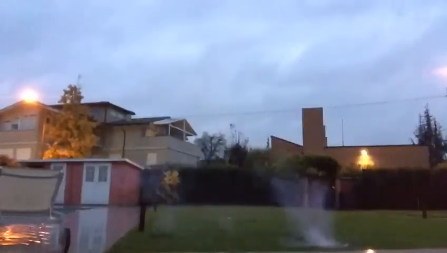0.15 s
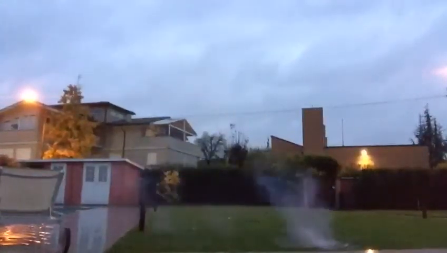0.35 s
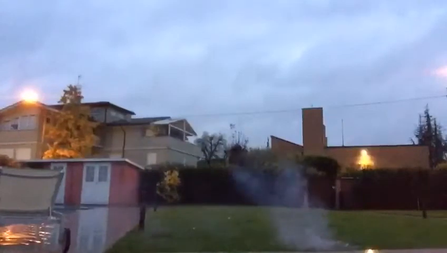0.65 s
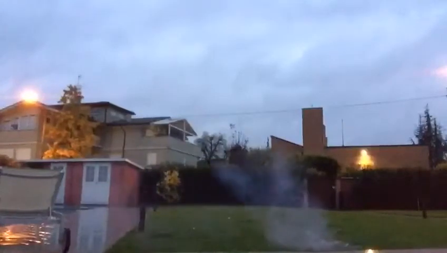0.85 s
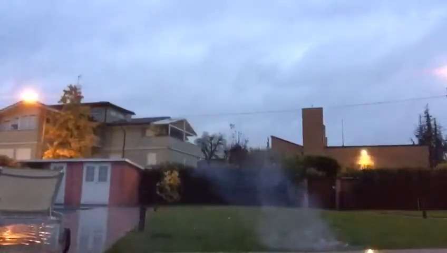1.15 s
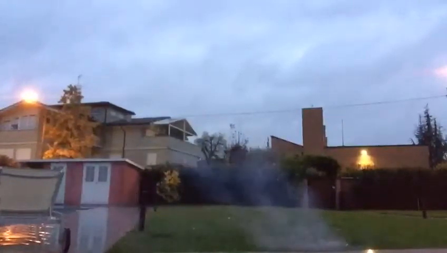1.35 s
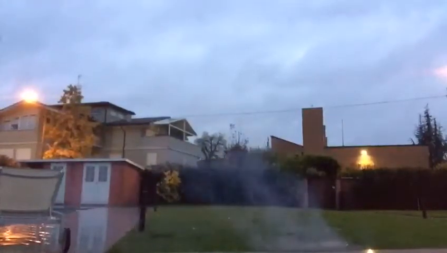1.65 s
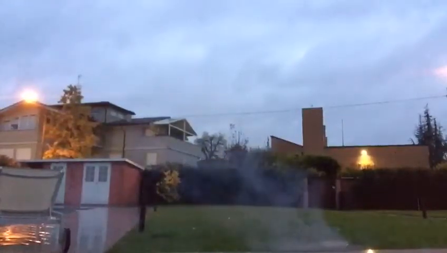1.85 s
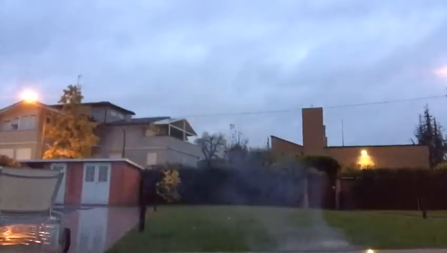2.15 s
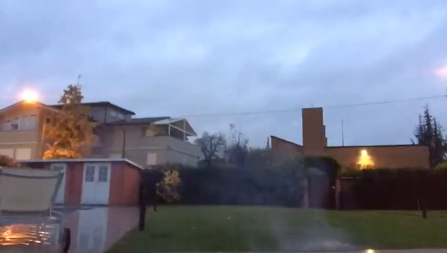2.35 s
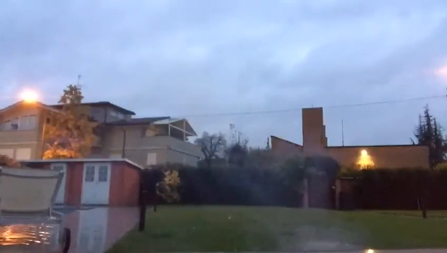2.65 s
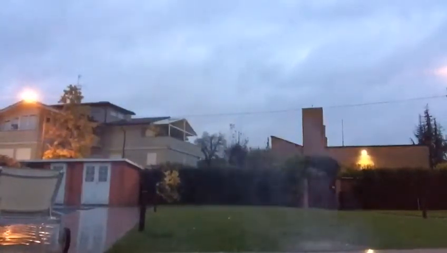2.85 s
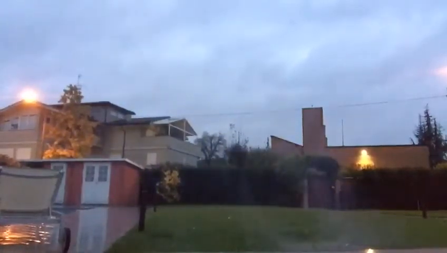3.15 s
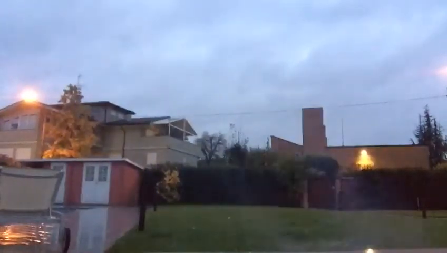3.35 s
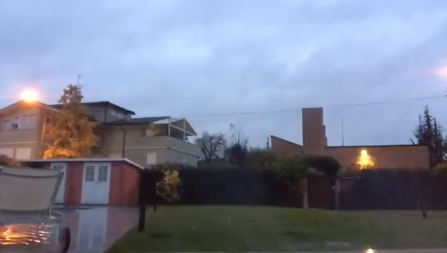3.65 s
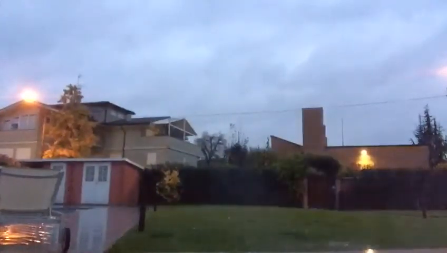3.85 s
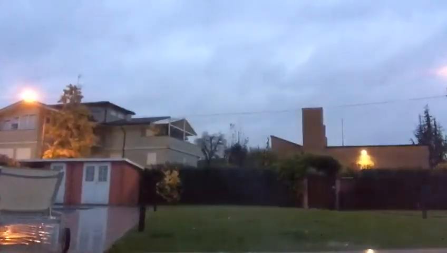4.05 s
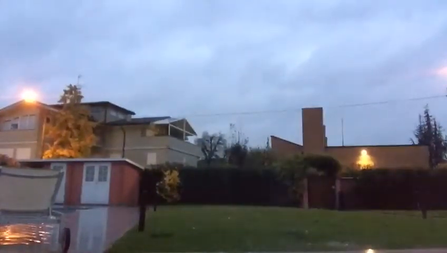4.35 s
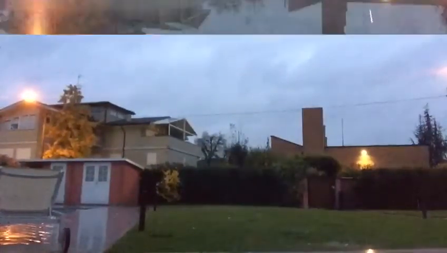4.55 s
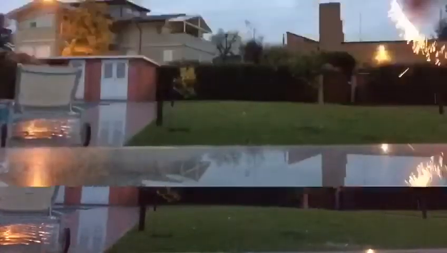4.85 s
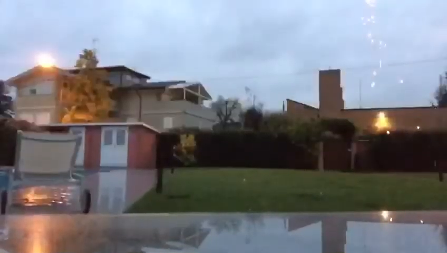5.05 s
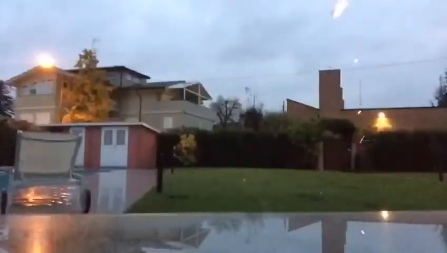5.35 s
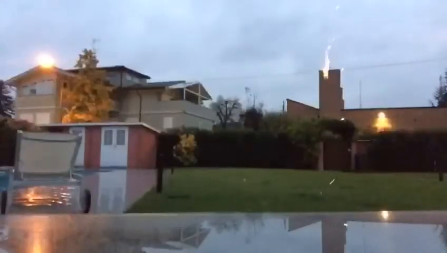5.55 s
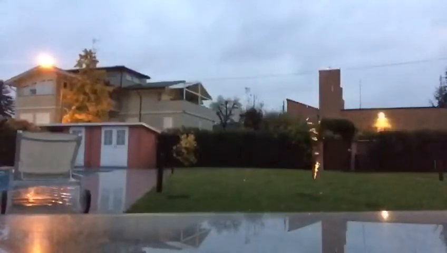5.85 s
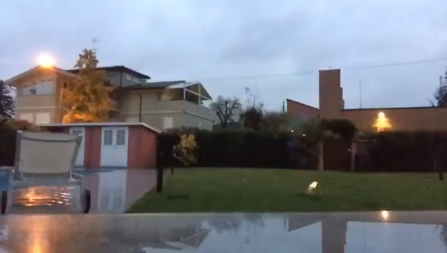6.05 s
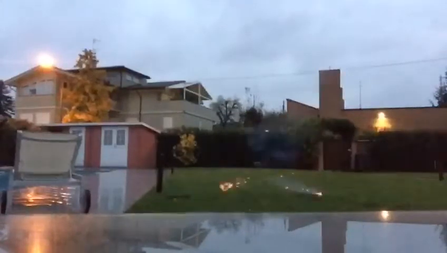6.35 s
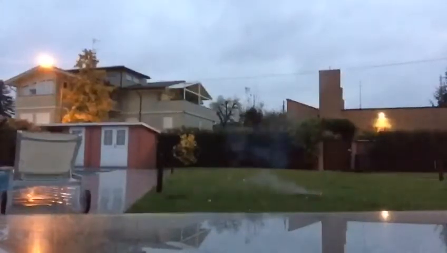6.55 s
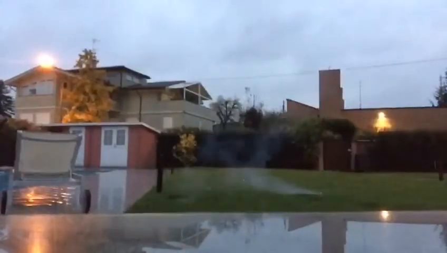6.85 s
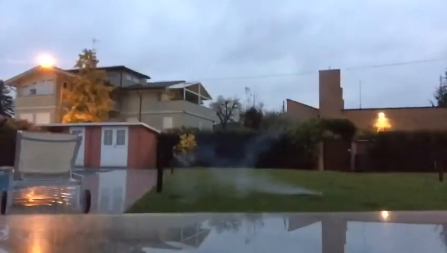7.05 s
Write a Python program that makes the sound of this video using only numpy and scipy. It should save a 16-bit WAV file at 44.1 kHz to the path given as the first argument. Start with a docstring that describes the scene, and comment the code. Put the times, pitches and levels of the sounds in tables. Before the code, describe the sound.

A low town hum with wavering distant traffic runs throughout, heard from a garden among houses. At the start a firework's soft rush dies away, and the traffic swells slightly around 1 to 1.5 seconds. At 3 seconds a tight cluster of loud, dull firecracker booms comes from a distance and echoes along the street. Smaller booms follow between 3.6 and 4.3 seconds, with faint hisses, two hollow pops at about 3.8 and 4.05, and a deep rumble lasting about a second. From 4.6 a rocket hisses up in sputtering spurts, thinning by 5.5 to a faint fuse sizzle. At 6.2 and 6.7 seconds two firecrackers burst nearby on the lawn, by far the loudest sounds, sharp and overloading the microphone. Each slaps back off house fronts and leaves a dull roll. The level drops suddenly just after 7 seconds.

```python
"""A garden among houses, with firecrackers going off over the hum of a town. Dull booms come from out of
sight, followed by smaller ones and two hollow pops. A rocket hisses up on the gas from its burning
powder. Then two crackers burst on the lawn, and their blast waves overload the microphone.
Hedges and house fronts scatter and echo the bangs."""
import sys
import numpy as np
from scipy import signal
from scipy.fft import rfft, irfft
from scipy.io import wavfile

SR = 44100
rng = np.random.default_rng(int(sys.argv[2]) if len(sys.argv) > 2 else 0)


def transcribe(u):
    """Save the signal u as a 16-bit wav file named by the first command-line argument.

    u: samples, shape (n,) or (channels, n), limited to [-1, 1]; the rate is SR.
    q: integer samples, one column per channel.
    """
    v = np.clip(np.atleast_2d(u).T, -1, 1)
    q = np.round(v * 32767).astype(np.int16)
    wavfile.write(sys.argv[1], SR, q)


N = 317516
T = np.arange(N) / SR


def gain(db):
    """Turn decibels (dB) into a number to multiply by."""
    return 10 ** (np.asarray(db) / 20)


def unit(x):
    """Scale a sound to an average power of 1."""
    return x / np.sqrt(np.mean(x ** 2))


def decay(start, fade, rise=0.0001):
    """Loudness that rises at start and dies away. A fade time is the seconds it takes to fall 60 dB."""
    age = np.maximum(T - start, 0)
    return -np.expm1(-age / rise) * np.exp(-np.log(1000) * age / fade)


def swell(start, full, end, sag_db_per_s, fade, bend=1):
    """Loudness that builds from start to full, then sags, and dies away after end."""
    build = np.clip((T - start) / (full - start), 0, 1) ** bend
    sag = gain(-sag_db_per_s * np.maximum(T - full, 0))
    return build * sag * np.exp(-np.log(1000) * np.maximum(T - end, 0) / fade)


def colour(x, tone, size=4096):
    """Filter a sound to follow rows of (Hz, dB); white noise keeps its power."""
    hz, db = np.transpose(tone)
    freqs = np.maximum(np.fft.rfftfreq(size, 1 / SR), 1)
    cepstrum = irfft(np.log(gain(np.interp(np.log(freqs), np.log(hz), db))))
    cepstrum[1:size // 2] *= 2  # folded so the filter rings only after a sound, never before
    cepstrum[size // 2 + 1:] = 0
    response = irfft(np.exp(rfft(cepstrum)))
    return signal.oaconvolve(x, response / np.linalg.norm(response))[:N]


def band(hz, width):
    """Noise around one pitch, filtered twice for steep edges."""
    b, a = signal.iirpeak(hz, hz / width, fs=SR)
    return unit(signal.lfilter(b, a, signal.lfilter(b, a, rng.standard_normal(N))))


def wander(per_second):
    """A line that drifts between random values, mostly within -1 to 1."""
    points = rng.standard_normal(4096)
    return np.interp(T * per_second, np.arange(len(points)), points)


def scatter(spread_db, clump_db):
    """Many tiny echoes of uneven strength, arriving in clumps."""
    return unit(rng.standard_normal(N) * gain(spread_db * wander(830) + clump_db * wander(130)))


def shock(start, length):
    """A blast wave: the air pressure jumps, then a longer suction follows."""
    age = np.maximum(T - start, 0) / length
    return (T >= start) * (1 - age) * np.exp(-age)


# The direct sound, then its bounces off a table and walls. Each row: delay in seconds, level in dB.
PATIO_BOUNCES = [(0, 6.5), (.0019, -17.5), (.0036, -16.5), (.0061, -13.5), (.0092, -11), (0.0135, -9.5),
                 (0.022, -18)]
def patio(x):
    """Hard surfaces close by add quick copies, which make a sound hollow."""
    copies = sum(gain(db) * np.interp(T - delay, T, x, left=0) for delay, db in PATIO_BOUNCES)
    return copies / np.linalg.norm([gain(db) for delay, db in PATIO_BOUNCES])


def rumble():
    """Deep bass that is always there and stands out for about a second after the big booms."""
    steady = gain(-46.5) * band(hz=65.4, width=20)
    rise = gain(-33) * swell(start=3.5, full=4, end=4.5, sag_db_per_s=4.5, fade=0.88)
    even_bass = unit(np.tanh(band(hz=68.4, width=24.5)))  # squashed to hold its level
    return steady + rise * even_bass


# The tone of the town's hum. Each row: frequency in Hz, relative level in dB.
HUM_TONE = [(15, -47), (25, -21), (40, -9), (60, -2.5), (77, -2), (107, -7), (299, -8), (425, -15),
            (470, -15), (756, -10.5), (972, -17.5), (1910, -29.5), (2520, -29.5), (3960, -38.5),
            (10000, -42), (13000, -92), (22000, -120)]
# Swells of low roar: distant traffic, and the roar under the burning fireworks at 0 and 5.1 seconds.
# Each row: loudest moment in seconds, half length in seconds, roar in dB, higher whoosh in dB.
ROAR_SWELLS = [(0, 0.17, -41, -49), (0.847, .45, -49.5, -47.5), (1.486, 0.085, -40.5, -69),
               (5.1, 0.19, -42.5, -52)]
def background():
    """The town's hum, rumble and wavering traffic, with swells of low roar on top."""
    roar_power, whoosh_power = gain(-52) ** 2, gain(-50) ** 2  # steady traffic and its tyres
    for when, half_length, roar_db, whoosh_db in ROAR_SWELLS:
        hump = np.exp(-((T - when) / half_length) ** 2)
        roar_power += hump * gain(roar_db) ** 2
        whoosh_power += hump * gain(whoosh_db) ** 2
    hum = unit(colour(rng.standard_normal(N), HUM_TONE)) * gain(-40)
    roar = band(hz=560, width=520) * np.sqrt(roar_power) * gain(2 * wander(25))
    whoosh = band(hz=930, width=317) * np.sqrt(whoosh_power) * gain(2 * wander(25) + 2 * wander(5))
    return hum + roar + whoosh + rumble()


# Far pops. Each row: loudest moment in seconds, level in dB, pitch in Hz, rise and fall time in seconds.
FAR_POPS = [(3.767, -26, 533, 0.009), (4.05, -18, 632, 0.0041)]
def pops():
    """Small far pops arrive as a few wavering cycles of one hollow note."""
    out = 0
    for when, db, hz, length in FAR_POPS:
        note = np.sin(2 * np.pi * hz * (T - when)) + 0.3 * band(hz, width=260)
        out += gain(db) * np.exp(-np.abs(T - when) / length) * note
    return out


# Three bands of noise: rush, hiss and sizzle. Each row: centre in Hz, width in Hz.
HISS_BANDS = [(2620, 1540), (6400, 4100), (9200, 2300)]
# For rush, hiss and sizzle in turn: how the build-up bends (1 is a straight line).
HISS_BENDS = [0.96, 1.06, 0.95]
# For the same three: how fast each weakens after building up, in dB per second.
HISS_SAGS = [33, 14.5, 9.5]
# Each row: start, end of build-up and start of fade in seconds, then rush, hiss and sizzle in dB.
# At 3.25, 3.53 and 4.28 seconds: faint, brief hisses after the booms, like bright echoes of their cracks.
HISSES = [(-.2, 0.034, .09, -43.5, -85, -85), (3.25, 3.38, 3.33, -55, -68, -61),
          (3.53, 3.58, 3.59, -79, -62, -64), (4.28, 4.347, 4.3, -53, -74, -80),
          (4.577, 4.715, 4.76, -43.5, -49, -55.5), (4.71, 4.865, 4.94, -41.5, -41.5, -46.5),
          (4.955, 5.077, 5.13, -43.5, -60, -40.5), (5.098, 5.31, 5.37, -53.5, -59, -46),
          (5.2, 5.623, 6.23, -58, -57, -60.5)]
def rocket_and_hisses():
    """A firework dies away, faint hisses follow the booms, a rocket spurts gas, then a fuse burns."""
    rush, hiss, sizzle = [band(hz, width) for hz, width in HISS_BANDS]
    rush = signal.sosfilt(signal.butter(6, 3560, "low", fs=SR, output="sos"), rush)
    low_roar = gain(-6.5) * band(hz=560, width=460)
    out = 0
    for k, noise in enumerate([rush + low_roar, hiss, sizzle]):
        power = 0
        for start, full, end, *levels_db in HISSES:
            shape = swell(start, full, end, HISS_SAGS[k], fade=0.69, bend=HISS_BENDS[k])
            power += (gain(levels_db[k]) * shape) ** 2
        out += noise * np.sqrt(power)
    sputter = gain(1.2 * wander(45))
    return patio(sputter * out)


# The tones of a boom's crack and of its street echo. Each row: frequency in Hz, relative level in dB.
CRACK_TONE = [(40, -8), (200, 8.5), (600, 4.5), (1000, -5.5), (1600, -17.5), (2600, -18.5), (4500, -40),
              (7000, -37.5), (10000, -42.5)]
STREET_TONE = [(40, 8.5), (200, -4.5), (520, 2.5), (950, -3), (1600, -16.5), (2600, -25.5), (4500, -42),
               (10000, -46)]
# The notes a boom rings with. Each row: pitch in Hz, level in dB, fade time in seconds.
BOOM_NOTES = [(52, -17, 0.32), (102.4, -12, 0.29), (130.6, -6.5, 0.32), (145, -10, 0.14),
              (230.7, -0.5, 0.076), (257.5, -9, 0.097), (380, -20, 0.076), (649, -2, 0.032),
              (870, -6.5, 0.042), (1030, -14, 0.035), (1467, -13.5, 0.12), (2450, -5, .04)]
# The routes a boom takes to us, the later ones blunter.
# Each row: delay in seconds, push change in dB, times the push is stretched, crack change in dB.
BOOM_ROUTES = [(0, 0.5, 0.86, 2), (.0042, -3, 1.87, -9), (0.0172, -5.5, 8, -15), (0.0473, -7.5, 9, -28),
               (.0674, -3, 8, -30)]
# The street fills with sound, then far house fronts answer.
# Each row: delay in seconds, level change in dB, rise and fade times in seconds.
STREET_ANSWERS = [(.007, -33, 0.0064, 1), (0.261, -25, 0.058, 0.56)]
# Blasts out of sight. Each row: start in seconds, level in dB, push length before stretching in seconds,
# crack in dB above that level, the crack's fade time in seconds.
HIDDEN_BLASTS = [(3.0135, -2, 0.0003, -7.5, 0.12), (3.0482, -5.5, 0.00021, 5, 0.034),
                 (3.0533, 6, 0.00034, -2.5, 0.063), (3.1136, -9.5, 0.001, 3, 0.07),
                 (3.639, -19.5, 0.0048, -16, .05), (3.693, -17, 0.0069, -30, 0.055),
                 (3.746, -25, 0.003, -15, 0.11), (4.128, -19, 0.00033, -5.5, 0.14),
                 (4.154, -24, 0.00013, -1.5, 0.096), (4.199, -27.5, 0.00064, -2.5, 0.29),
                 (4.31, -30, 0.0014, -10, 0.31)]
def booms():
    """Muffled blasts: a push of air rings low notes, a short crack rides on it, and the houses answer."""
    push, crack_power, street_power = 0, 0, 0
    for start, db, length, crack_db, crack_fade in HIDDEN_BLASTS:
        for delay, route_db, stretch, route_crack_db in BOOM_ROUTES:
            stretched = length * stretch  # a longer push sounds deeper
            push += 2 * gain(db + route_db) * shock(start + delay, stretched) / (stretched * SR)
            crack_shape = decay(start + delay, crack_fade, rise=0.0012)
            crack_power += (gain(db + crack_db + route_crack_db) * crack_shape) ** 2
        for delay, echo_db, rise, fade in STREET_ANSWERS:
            street_power += (gain(db + echo_db) * decay(start + delay, fade, rise)) ** 2
    t = T[:SR]
    ring = sum(gain(db) * np.cos(2 * np.pi * hz * t) * np.exp(-np.log(1000) * t / fade)
               for hz, db, fade in BOOM_NOTES)
    muffle = signal.butter(2, 1100, "low", fs=SR, output="sos")
    body = signal.sosfilt(muffle, signal.oaconvolve(push, ring)[:N])
    cracks = colour(np.sqrt(crack_power) * scatter(spread_db=2.5, clump_db=3), CRACK_TONE)
    echoes = colour(np.sqrt(street_power) * scatter(spread_db=2, clump_db=1.5), STREET_TONE)
    return body + patio(cracks + echoes)


# The tones of the garden's scatter, the house echoes and the long roll.
# Each row: frequency in Hz, relative level in dB.
GARDEN_TONE = [(30, -22.5), (100, -11.5), (250, -4.5), (430, -5), (620, 3), (950, -8), (1700, -13),
               (2800, -12.5), (4300, -24.5), (7000, -24.5), (10000, -28.5)]
HOUSE_TONE = [(30, -20.5), (120, -11.5), (280, 4), (550, 2.5), (950, -14), (1700, -20), (2900, -11.5),
              (4200, -25.5), (6500, -28), (8500, -35), (10000, -42.5)]
ROLL_TONE = [(40, -47), (130, -9), (330, 4.5), (600, 1.5), (1100, -4), (1900, -8.5), (2700, -5.5),
             (3300, -13.5), (4200, -27), (6000, -28), (8000, -45), (10000, -47)]
# Echoes off the houses. Each row: delay in seconds, level change in dB, rise and fade times in seconds.
HOUSE_ECHOES = [(0.045, -17, .002, 0.078), (0.103, -18, 0.0024, 0.14), (.123, -18.5, 0.001, 0.12),
                (0.138, -26.5, 0.012, 1), (0.251, -27.5, 0.0057, 0.51)]
# Crackers on the lawn. Each row: start in seconds, level in dB, the scatter's fade time in seconds,
# echo change in dB, then the slap off the facing house: delay in seconds, level change in dB.
LAWN_CRACKERS = [(6.1996, 13, 0.28, -1, 0.263, -24.5), (6.6702, 10.5, 0.26, -3.5, 0.322, -33.5)]
def crackers():
    """Each burst sends a shock, scatter from lawn and hedges, house echoes and a long dull roll."""
    direct, garden_power, house_power = 0, 0, 0
    roll_power = (gain(-32.5) * decay(start=-0.046, fade=1)) ** 2  # an earlier bang is still dying away
    for start, db, scatter_fade, echo_db, slap_delay, slap_db in LAWN_CRACKERS:
        direct += gain(db + 8.5) * shock(start, length=0.0013)
        garden_power += (gain(db) * decay(start, scatter_fade)) ** 2
        roll_power += (gain(db + echo_db - 29) * decay(start + 0.21, fade=2.1, rise=0.12)) ** 2
        house_power += (gain(db + slap_db) * decay(start + slap_delay, fade=0.4, rise=0.011)) ** 2
        for delay, wall_db, rise, fade in HOUSE_ECHOES:
            house_power += (gain(db + echo_db + wall_db) * decay(start + delay, fade, rise)) ** 2
    garden = colour(np.sqrt(garden_power) * scatter(spread_db=4.5, clump_db=-0.5), GARDEN_TONE)
    houses = colour(np.sqrt(house_power) * scatter(spread_db=3, clump_db=0.5), HOUSE_TONE)
    roll = colour(np.sqrt(roll_power) * scatter(spread_db=2, clump_db=2.5), ROLL_TONE)
    return patio(direct + garden + houses + roll)


def scene():
    """Everything as it reaches the microphone, in one channel."""
    return (crackers() + booms() + pops() + rocket_and_hisses() + background())[None]


def cut_treble(x, hz):
    """Steeply remove the sound above hz."""
    return signal.sosfilt(signal.ellip(8, 0.2, 70, hz, fs=SR, output="sos"), x)


# The whole sound drops away at the end. Each row: time in seconds, level in dB.
END_DROP = [(7.028, 0), (7.033, -9.5), (7.2, -11)]
def record(dry):
    """The microphone loses deep bass, overloads, loses treble and clips again; the level drops last."""
    x = signal.sosfilt(signal.butter(2, 24, "high", fs=SR, output="sos"), dry)
    squashed = x / (1 + x ** 8) ** (1 / 8)
    clipped = np.clip(cut_treble(squashed, hz=10200), -0.95, 0.95)
    times, levels_db = np.transpose(END_DROP)
    drop = gain(np.interp(T, times, levels_db))
    return cut_treble(clipped * drop, hz=15600)


dry = scene()
out = record(dry)
transcribe(out)
```